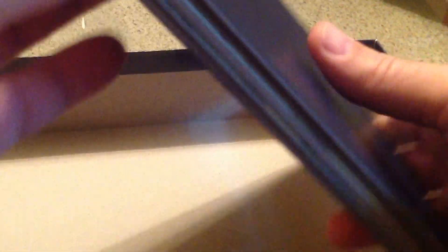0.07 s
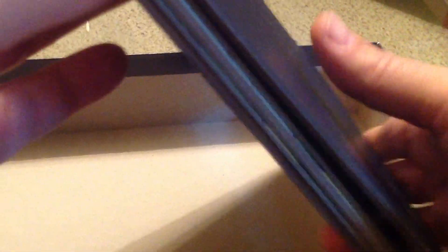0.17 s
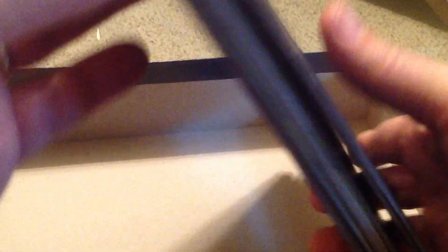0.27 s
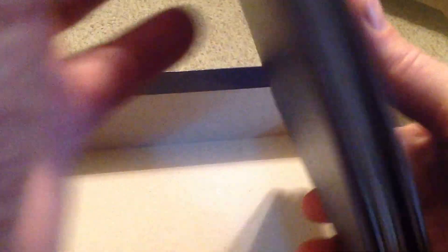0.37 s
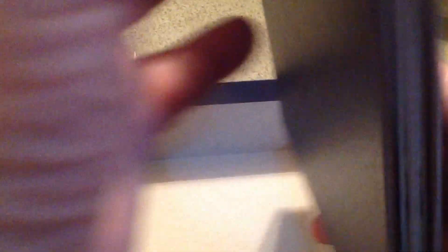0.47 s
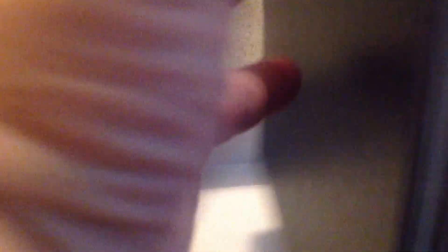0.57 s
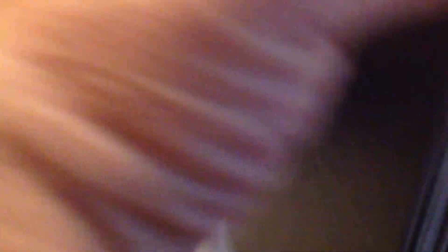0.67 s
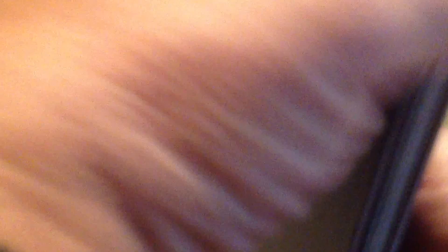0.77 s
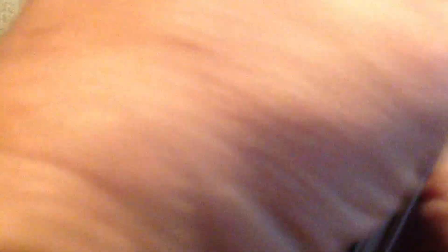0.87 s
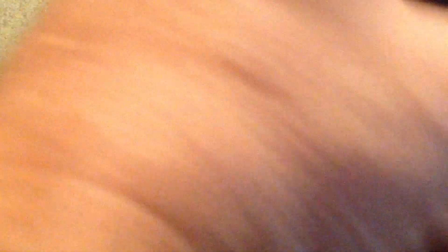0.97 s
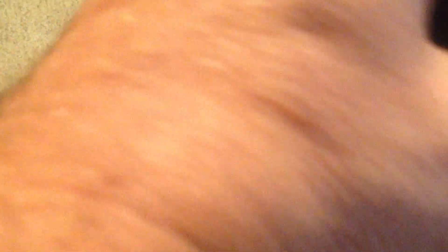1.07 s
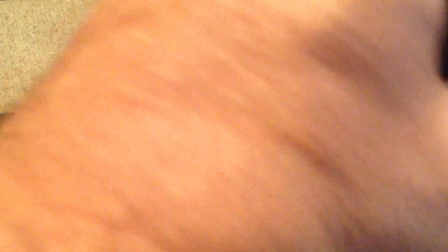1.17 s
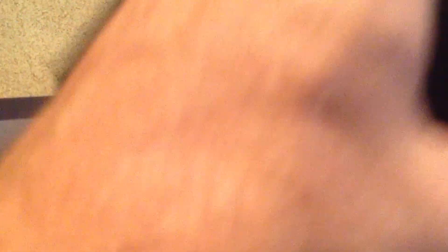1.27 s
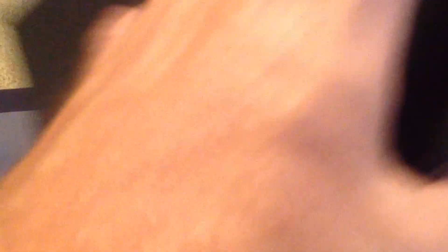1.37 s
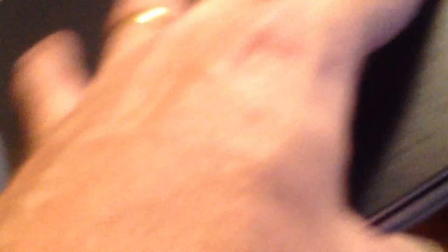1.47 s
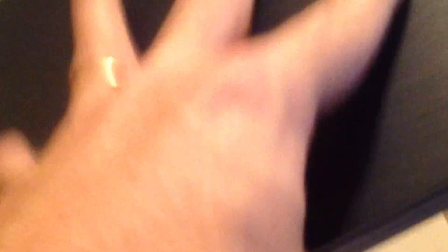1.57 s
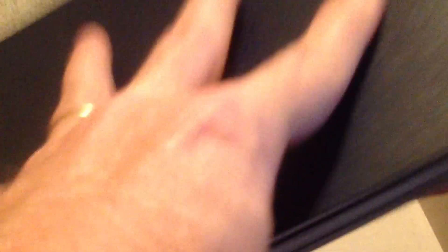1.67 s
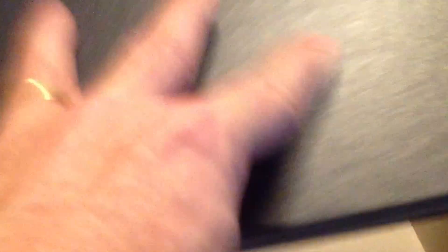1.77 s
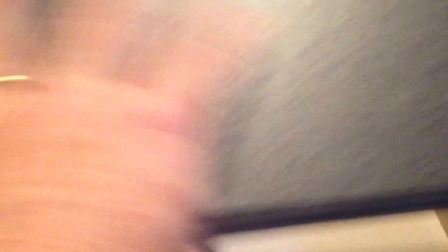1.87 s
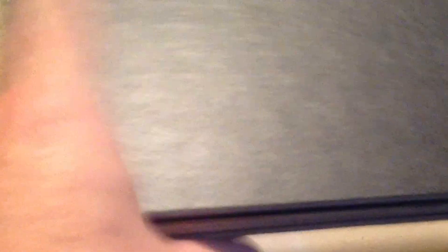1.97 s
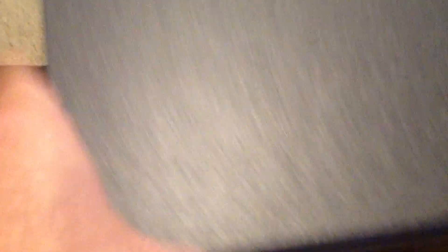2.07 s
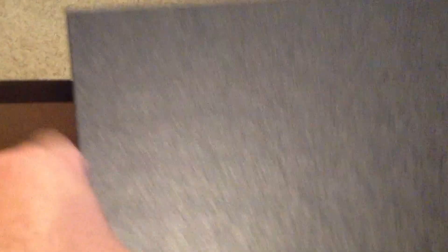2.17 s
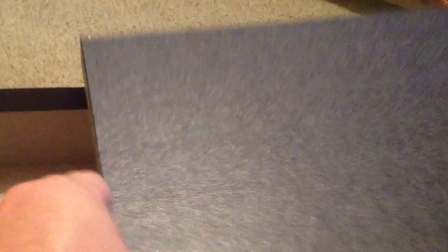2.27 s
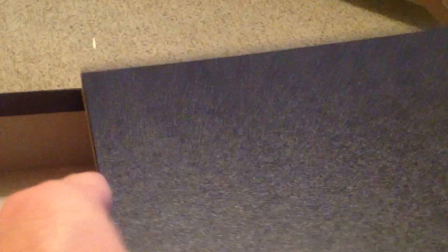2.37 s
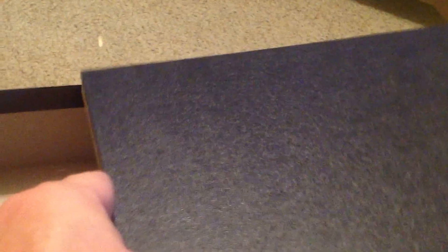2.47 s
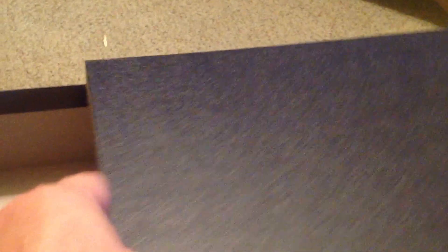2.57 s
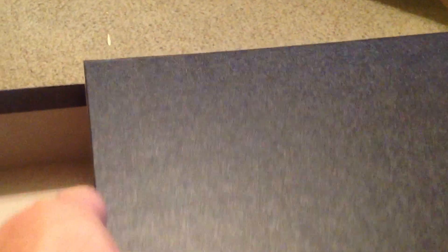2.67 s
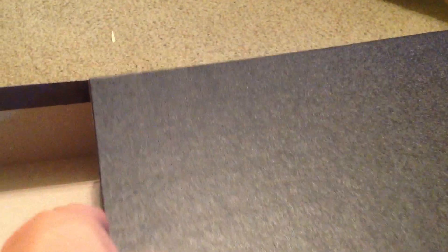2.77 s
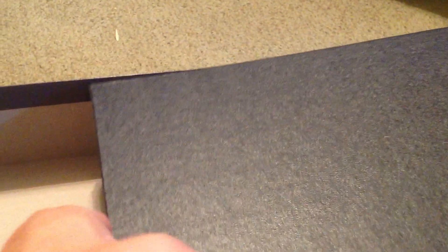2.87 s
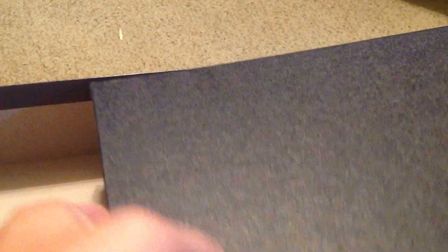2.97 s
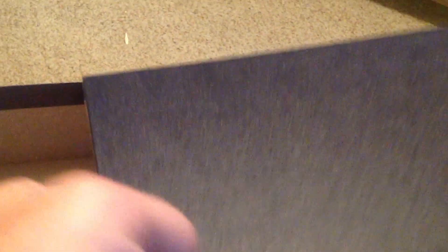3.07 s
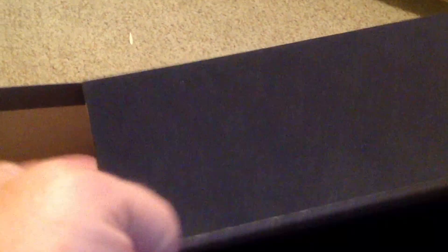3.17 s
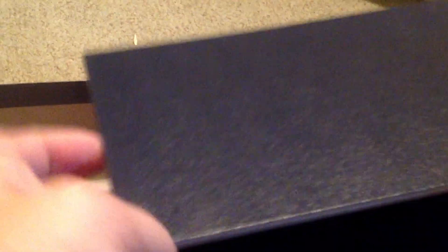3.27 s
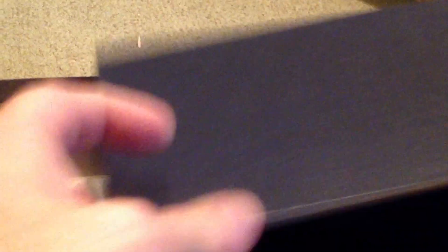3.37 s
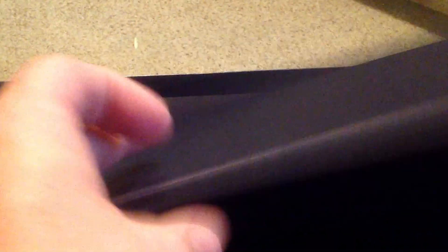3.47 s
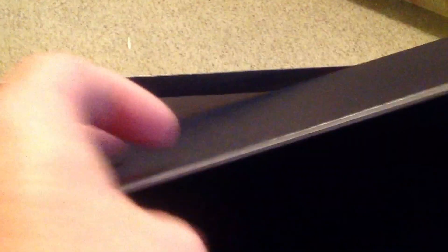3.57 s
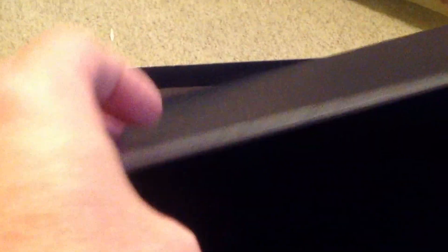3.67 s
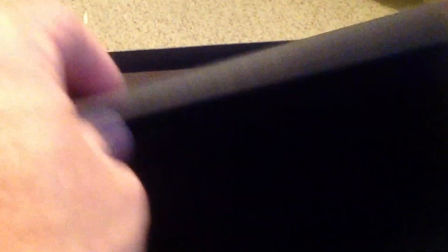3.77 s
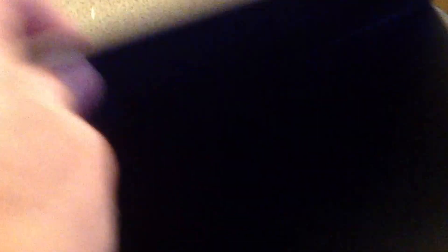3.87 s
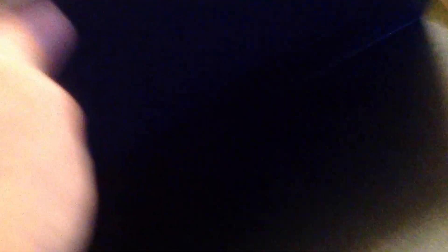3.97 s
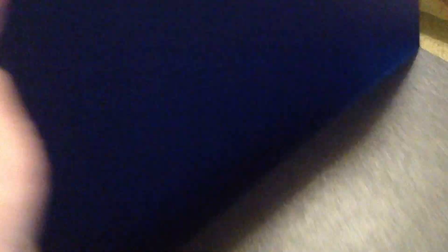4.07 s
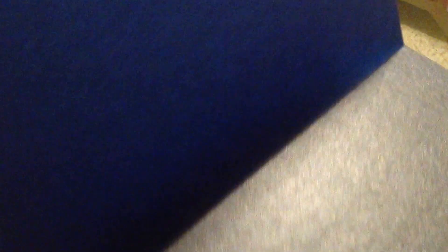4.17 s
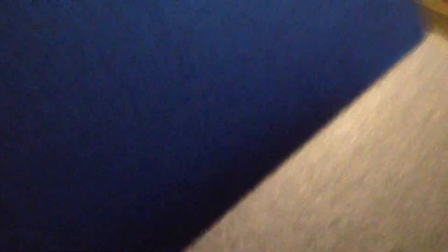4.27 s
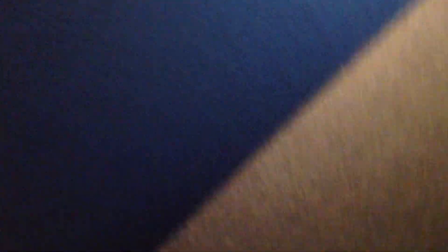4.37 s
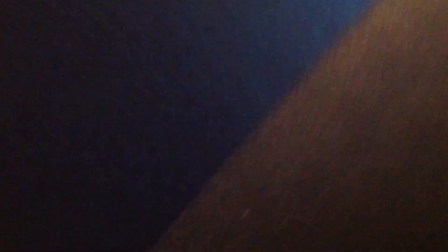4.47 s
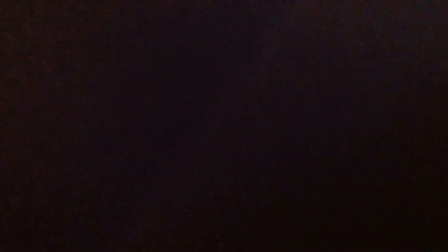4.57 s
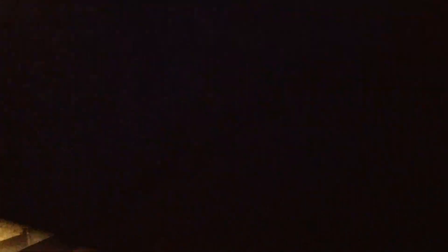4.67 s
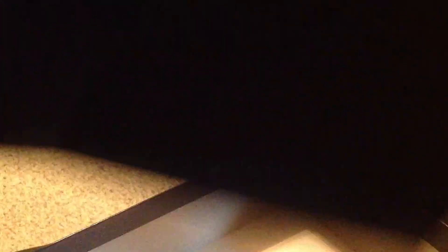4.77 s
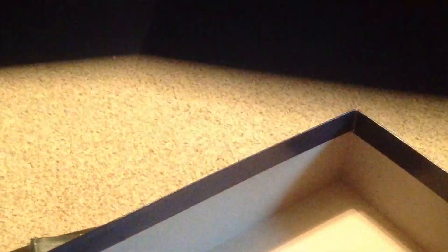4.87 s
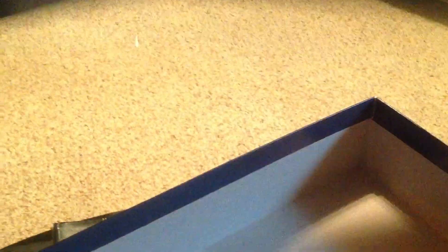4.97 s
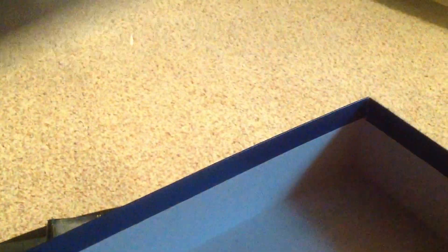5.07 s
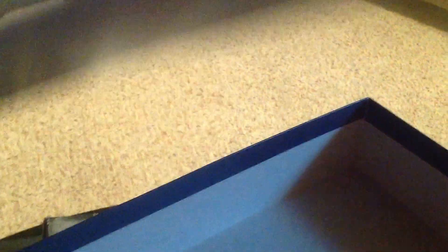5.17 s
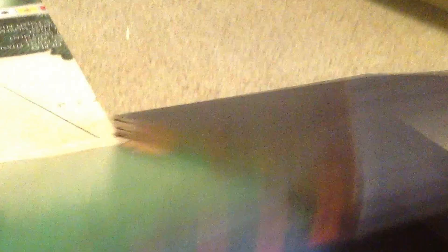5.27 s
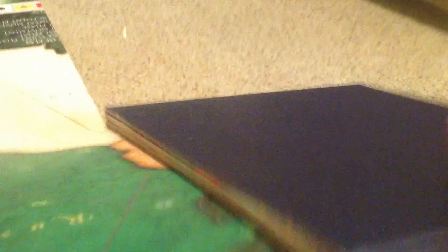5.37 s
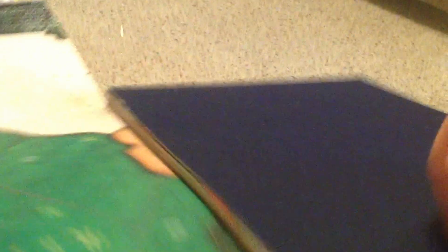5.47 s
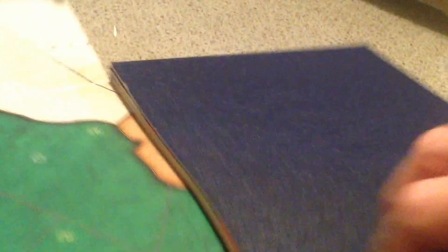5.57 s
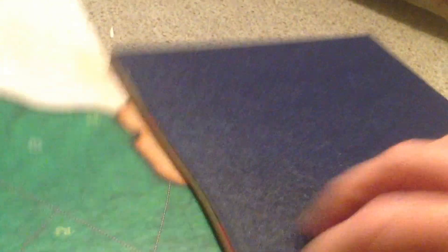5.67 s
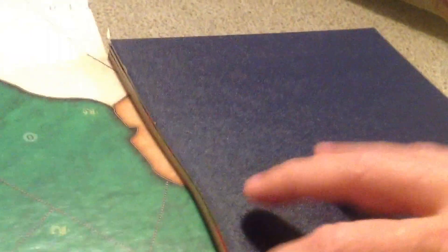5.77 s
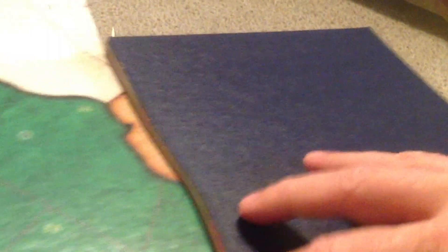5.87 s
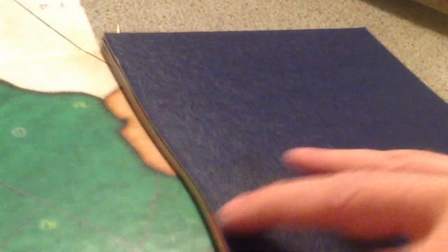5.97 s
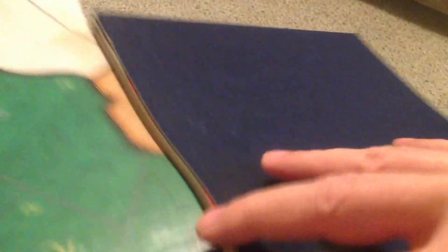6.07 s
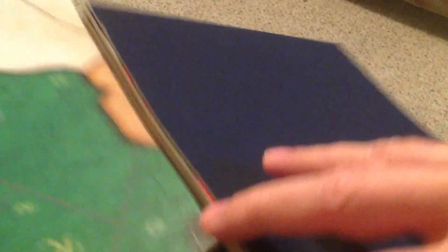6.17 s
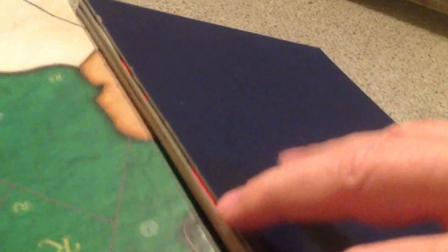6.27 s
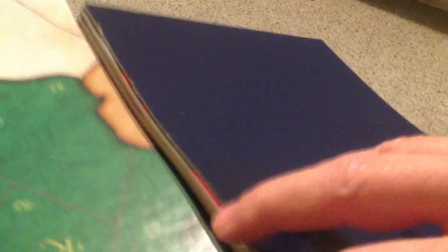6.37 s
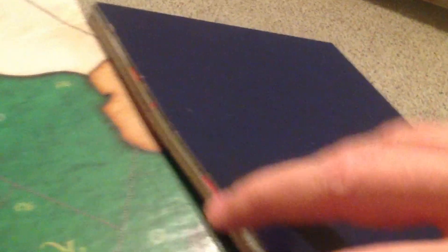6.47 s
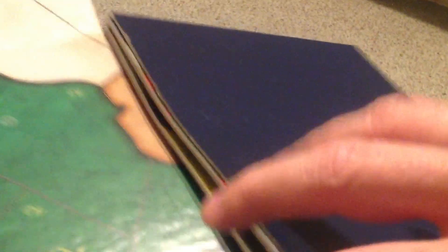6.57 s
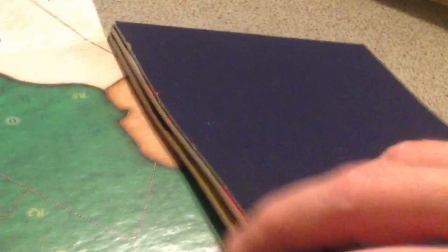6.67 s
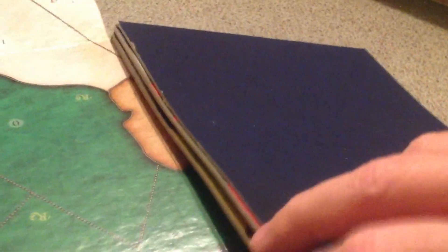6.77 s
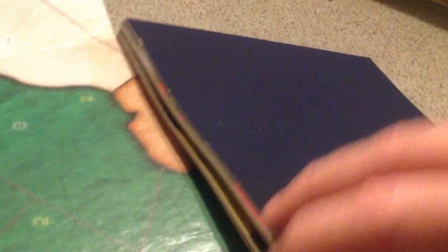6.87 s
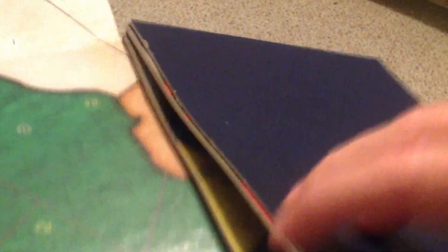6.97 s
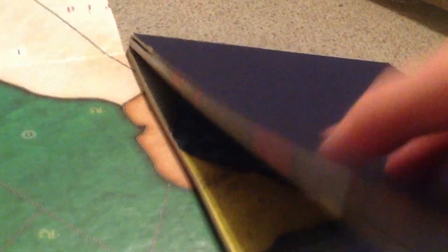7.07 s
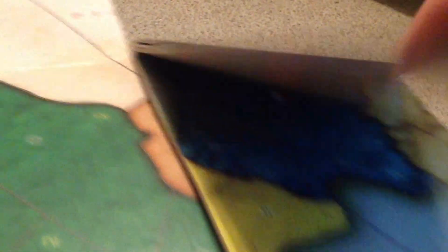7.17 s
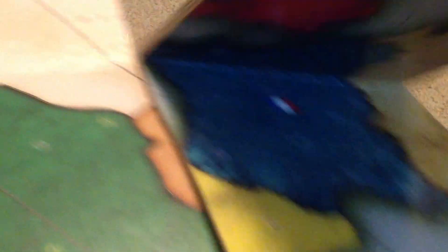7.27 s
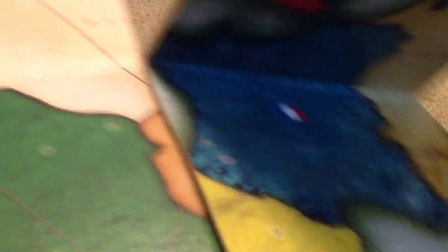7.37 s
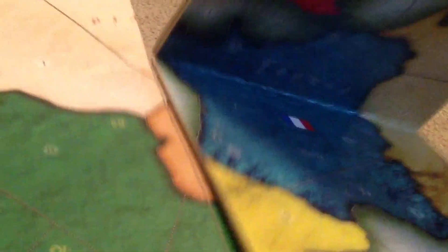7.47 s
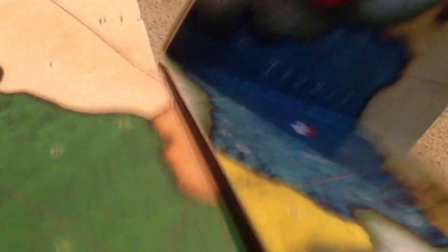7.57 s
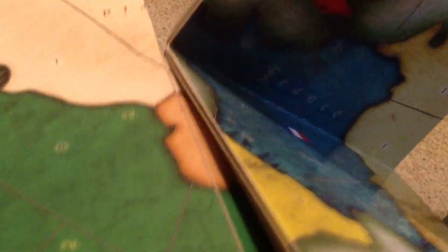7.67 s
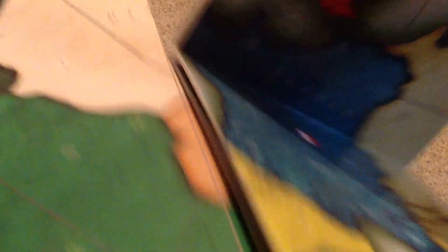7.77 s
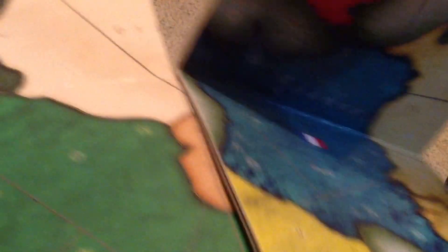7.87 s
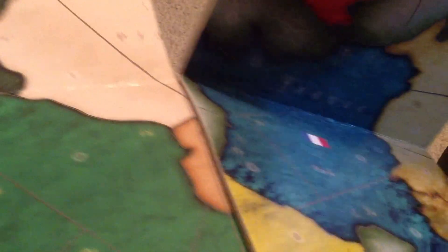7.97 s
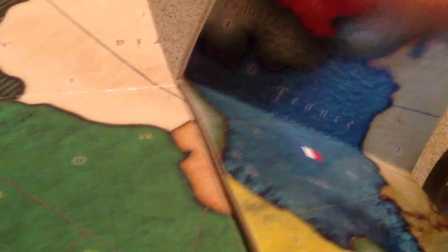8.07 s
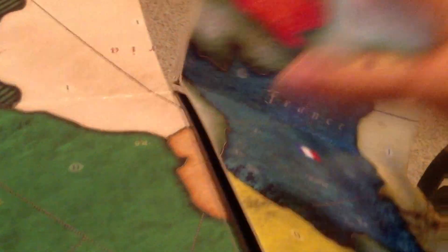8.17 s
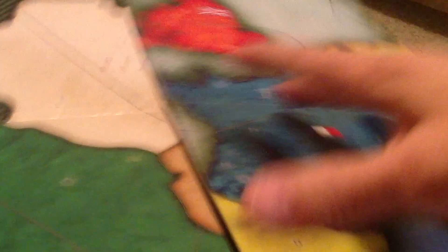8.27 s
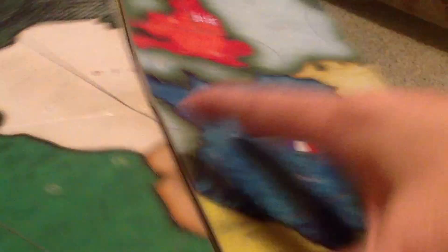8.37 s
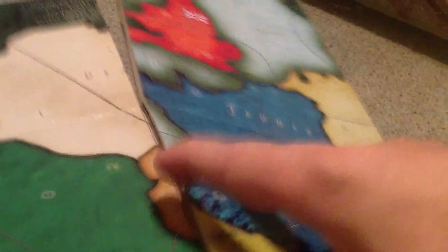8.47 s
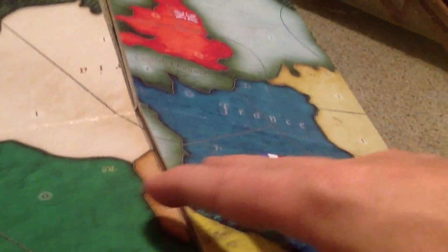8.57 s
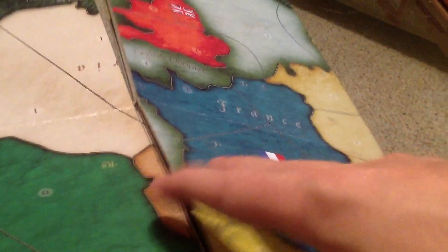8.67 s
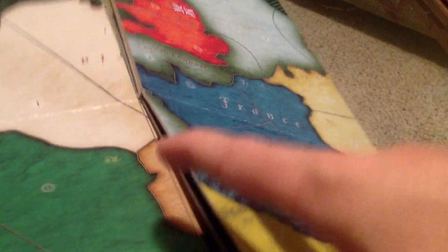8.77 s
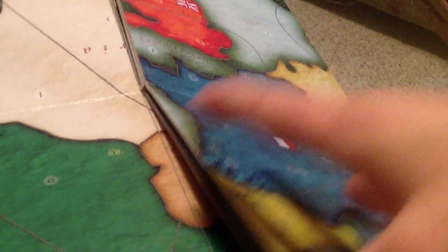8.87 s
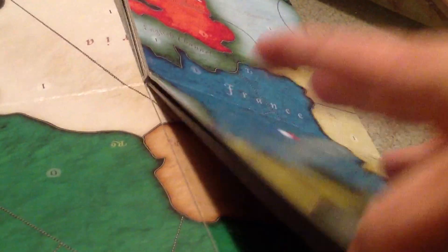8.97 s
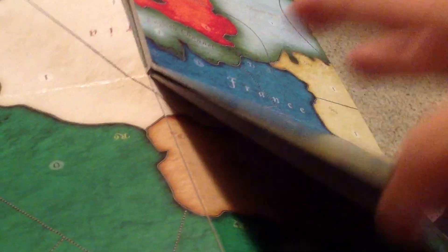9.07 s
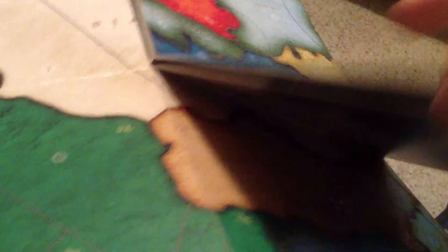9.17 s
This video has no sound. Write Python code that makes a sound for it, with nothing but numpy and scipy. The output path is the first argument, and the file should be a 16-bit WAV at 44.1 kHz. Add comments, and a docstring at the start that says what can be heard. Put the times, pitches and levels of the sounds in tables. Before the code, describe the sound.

A phone very close to the hands, in a small carpeted room with faint steady air and wavering hiss. At 0.5-0.8 s stiff card panels snap and knock sharply, then skin brushes softly over paper. Thumps and clicks come at 1.6-1.8 s. Around 2.3-2.8 s the board bumps a hollow box, with a strong dry scrape. Edge rasps lead to a rattling cluster of boxy bumps at 3.5-3.65 s, another at 4.0. Scrapes and light raps follow, with tiny high squeaks at 4.25 and 4.43 s and a rub near 4.75. A ringing flap at 5.2 precedes loud clattering slaps at 5.36-5.46 s. Small clicks and dry slides continue from 5.7, with clicks at 7.0 and 7.6 and stronger scraping near 7.9. The loudest event, a hard clap of panels, cracks at 8.37 s with a short echo. Woody fold tocks and little ticks finish by 9.1 s.

```python
"""Unfolding a cardboard game board

A folded board is lifted out of its box, laid on a carpet and unfolded, close to a phone in a small room.
Knocks are short contacts that ring the stiff panels; bumps set the walls of the hollow box booming.
Strokes are rough friction noise filtered by card and box, with a smooth skin hiss on the paper cover.
Two short squeaks are narrow noise whistles; room echo, steady air and a changing hiss lie behind it all.
"""
import sys
import numpy as np
from scipy import signal
from scipy.fft import rfft, irfft, next_fast_len
from scipy.io import wavfile
from scipy.ndimage import uniform_filter1d, map_coordinates

SR = 44100
rng = np.random.default_rng(int(sys.argv[2]) if len(sys.argv) > 2 else 0)


def persist_wave(psi):
    """Save psi, clipped to +-1, as 16-bit WAV."""
    counts = np.round(np.clip(psi, -1, 1) * 32767).astype(np.int16)
    wavfile.write(sys.argv[1], SR, np.atleast_2d(counts).T)


N = 407043
TIME = np.arange(N) / SR

# knocks on the board: (time [s], level before colouring [dB], treble from a harder or softer contact [dB],
# pitch of the struck spot [Hz], contact [name])
KNOCKS = [(0.5474, 8.5, -3.5, 4300, "snap"), (0.7502, 14, -8, 1650, "knuckle"),
          (0.7758, 10.5, -0.5, 3000, "snap"), (1.579, 10, -3, 2300, "thump"),
          (1.6079, -0.5, -1, 1340, "click"), (1.622, 1, -7, 2590, "click"), (1.6325, 2, -1, 660, "click"),
          (1.7853, -8, 8, 1600, "thump"), (1.8191, 13.5, -5.5, 2600, "thump"),
          (2.3433, -9.5, 3, 680, "box"), (2.3934, -10, 0, 570, "box"), (2.4965, 10.5, -4, 450, "clap"),
          (2.506, 9, -2, 480, "bump"), (2.5115, 11.5, -8, 480, "box"), (2.571, 2, -1, 550, "pad"),
          (2.8067, 8, -2, 900, "bump"), (3.5365, 4, -2, 580, "box"), (3.5705, 6.5, 12, 600, "box"),
          (3.579, 4, -4, 360, "box"), (3.602, 6, -5, 460, "box"), (3.613, 2, -10, 600, "box"),
          (3.641, -0.5, -2, 520, "box"), (3.985, 9, 1, 570, "box"), (4.2128, 0, -3, 1300, "knuckle"),
          (4.317, -4, -5, 1250, "knuckle"), (4.3362, -2, 4, 2720, "knuckle"),
          (4.429, 3.5, -1, 1270, "knuckle"), (4.7345, 5.5, -2, 1090, "clap"), (4.998, 4, -17, 380, "pad"),
          (5.1858, 16.5, -0.5, 930, "flap"), (5.276, -2.5, 3, 380, "pad"), (5.3619, 11, 3.5, 1950, "flap"),
          (5.3733, 20.5, 2, 1990, "slap"), (5.379, 12.5, 4, 2900, "click"), (5.4069, 18, -1, 700, "slap"),
          (5.4403, 13.5, -3, 1180, "slap"), (5.4539, 13, 1, 1520, "slap"), (5.4572, 10, -2, 1250, "click"),
          (5.724, 4.5, -2, 1080, "slap"), (5.7821, 2, -2, 330, "click"), (5.8262, -2, -4, 470, "click"),
          (5.8571, -3.5, -2, 950, "click"), (5.9066, -1, -12, 970, "knuckle"),
          (5.9534, 0, 2.5, 4300, "click"), (6.0151, 5, 3, 760, "nail"), (6.9554, 3.5, -2, 970, "click"),
          (7.0386, 1.5, -1.5, 1150, "click"), (7.6085, 11.5, -9, 2220, "click"),
          (7.7266, 7, -4, 330, "click"), (8.181, -7, -3, 1900, "click"), (8.3714, 27.5, 0, 1150, "clap"),
          (8.3772, 23.5, -4, 850, "slap"), (8.385, 21.5, -3, 320, "slap"), (8.395, 14.5, 3, 2700, "clap"),
          (8.4853, 4.5, -1, 950, "flap"), (8.5924, 0.5, 3, 690, "click"), (8.6256, -6.5, 4, 700, "click"),
          (8.7237, 4.5, 4, 2050, "fold"), (8.8086, 5, -2, 2100, "fold"), (8.8838, -1, 3, 600, "click"),
          (8.916, 0, -5, 520, "flap"), (9.0421, -1, -1, 640, "click"), (9.055, -2, -1.5, 600, "click"),
          (9.077, -2, -1, 670, "click"), (9.1096, 0.5, 1, 680, "click")]
# ways the board is struck: name: (air push [dB], thud [dB], snap [dB], tick [dB], ring [dB],
# struck spot [dB], crush decay [s], box boom [dB]), levels relative to the knock's
#   thump: a hand lands on the board            snap: the folded panels snap shut under a grip
#   bump: the board settles on the box rim      knuckle: a knuckle raps the cover
#   click: an edge or a fold catches            fold: a stiff fold gives way with a woody tock
#   nail: a fingernail or corner ticks          pad: a soft fingertip presses the panel
#   slap: an edge falls on a panel              clap: two panels meet over their whole faces and clatter
#   flap: a loose panel swings and rings        box: the board bumps the hollow box
CONTACTS = {"thump": (-14, 12, -9.5, -21.5, -9.5, 6, 0.0007, -2),
            "snap": (-14, 13, -18, -12, -9, 12, 0.0007, -2), "bump": (5, 9.5, -10, -29, 2, 5, 0.0012, 15.5),
            "knuckle": (-10, -4, -11, -29, 3, 9, 0.001, -12),
            "click": (-14, 8, -5, -22.5, -3, 6, 0.0007, -20), "fold": (-10, -8, -11, -23, 5, 5, 0.0015, -6),
            "nail": (-4, 0, -22, -16.5, -1.5, 5, 0.0007, -20),
            "pad": (-8, 11, -17, -36, 10, 7, 0.0007, -17), "slap": (2, -10, -14, -27, 0.5, 6, 0.0009, -3),
            "clap": (2, -9, -11, -24, 1, 3, 0.012, -1), "flap": (0, 0, -9.5, -28.5, 21, 5, 0.0007, -19),
            "box": (10, 4, -13, -28.5, 5, 6, 0.0018, 22.5)}
# basic spectrum of every knock: (frequency [Hz], level [dB])
BLOW = [(70, -38), (105, -21.5), (150, -20), (380, -4.5), (650, -2), (1000, -1), (1800, -1), (2700, 4),
        (4500, 4), (15000, -1.5)]
SPOT_OCTAVES = 0.22  # half-width of the struck spot's resonance


def knocks(size=4096, lag_s=0.00077, thud_hz=260, mid_lo_hz=620, mid_hi_hz=1250, snap_hz=2400, tick_hz=8500):
    """A sharp contact and its ring, coloured by how hard the two surfaces are and by where they meet."""
    t = np.arange(size) / SR
    hz = np.fft.rfftfreq(size, 1 / SR)
    # bending waves are dispersive: the treble arrives first, the lows trail (lag_s at 1 kHz)
    travel = np.exp(-4j * np.pi * lag_s * np.sqrt(1000 * hz))
    out = np.zeros(N + size)
    for s, db, treble_db, spot_hz, kind in KNOCKS:
        air_db, thud_db, snap_db, tick_db, ring_db, spot_db, crush_s, _ = CONTACTS[kind]
        hardness = [(70, air_db), (140, thud_db), (thud_hz, thud_db), (mid_lo_hz, 0), (mid_hi_hz, 0),
                    (snap_hz, snap_db + treble_db), (tick_hz, tick_db + treble_db)]
        octaves_off = np.log2((hz + 1) / spot_hz)
        spot = undb(spot_db / (1 + (octaves_off / SPOT_OCTAVES) ** 2))
        panel = rfft(unit_energy(contact(t, crush_s) + undb(ring_db) * panel_ring(t)))
        blow = panel * causal(gain_at(hz, BLOW) * gain_at(hz, hardness) * spot)
        start = int((s - lag_s / 2) * SR)
        out[start:start + size] += undb(db) * irfft(blow * travel)
    return out[:N]


def contact(t, crush_s, crush_hz=2200):
    """Card meets card: one push in the lows, a brief crush of fibres in the treble."""
    push = signal.lfilter(*signal.butter(1, crush_hz, fs=SR), signal.unit_impulse(len(t)))
    crush = unit_energy(rng.standard_normal(len(t)) * np.exp(-t / crush_s))
    return push + signal.lfilter(*signal.butter(2, crush_hz, "high", fs=SR), crush)


# bending modes of the panels: (frequency [Hz], time to fall 60 dB [s], level [dB])
PANEL_MODES = [(147, 0.063, 3), (212.4, 0.11, -1), (300, 0.03, 1), (447, 0.029, -1.5), (527, 0.062, -5.5),
               (629, 0.051, -4.5), (737, 0.056, -10), (928, 0.047, -7.5), (1270, 0.055, -14),
               (1668, 0.06, -14), (2000, 0.025, -8), (2440, 0.025, -7), (2845, 0.035, -10),
               (4200, 0.03, -9)]


def panel_ring(t, scatter=0.012, modes_db=-3):
    """Each contact point stirs the modes differently; many more die at once in a dense wash."""
    hz, t60, db = np.transpose(PANEL_MODES)[:, :, None]
    detune, turn = rng.standard_normal((2, len(hz), 1))
    swing = np.sin(2 * np.pi * (hz * (1 + scatter * detune) * t + turn))
    modes = undb(db) * np.exp(-np.log(1000) * t / t60) * swing
    wash = dying_noise(t, t60=0.078, damping=0.48)
    ring = undb(modes_db) * unit_energy(modes.sum(axis=0)) + wash
    return unit_energy(ring * (1 - np.exp(-t / 0.00025)))  # waves must first come back from the edges


def through_panel(x, modes_db=7):
    """Friction also rings the bending modes of the card."""
    ringing = sum(undb(db) * resonate(x, hz, np.log(1000) / (np.pi * t60)) for hz, t60, db in PANEL_MODES)
    return x + undb(modes_db) * ringing


def box_booms(size=8192, scatter=0.045):
    """A bump sets the box walls swinging, a little higher or lower with the load on them."""
    out = np.zeros(N + size)
    push = signal.unit_impulse(size)
    for s, db, _, _, kind in KNOCKS:
        start = int(s * SR)
        boom = through_box(push, 1 + scatter * rng.standard_normal())
        out[start:start + size] += undb(db + CONTACTS[kind][-1]) * boom
    return out[:N]


# the long and the short wall of the box: (frequency before retuning [Hz], filter width [Hz], level [dB])
BOX_MODES = [(532, 70, 0), (650, 70, -6)]


def through_box(x, tuning=1, skirt_hz=260):
    """The hollow box answers only near the pitches of its walls."""
    out = 0
    for hz, width_hz, db in BOX_MODES:
        wall = resonate(x, hz * tuning, width_hz)
        out = out + undb(db) * resonate(wall, hz * tuning, skirt_hz)
    return out


# sliding strokes: (time of fastest motion [s], rise and fade constants together [s],
# card scrape [dB], skin hiss [dB], pitch of the rubbed spot [Hz], surface [name])
STROKES = [(0.561, 0.14, -44.5, -49, 450, "carpet"), (0.88, 0.15, -50, -59, 1700, "box"),
           (0.935, 0.043, -52, -46.5, 560, "box"), (1.1, 0.072, -52.5, -47, 610, "box"),
           (1.62, 0.6, -58, -46.5, 700, "sheet"), (2.02, 0.16, -58, -42, 700, "card"),
           (2.455, 0.1, -39.5, -51, 750, "card"), (2.507, 0.016, -34, -36, 700, "sheet"),
           (2.53, 0.06, -34, -51, 600, "carpet"), (2.638, 0.24, -47, -60, 730, "card"),
           (3.13, 0.12, -51, -72, 550, "box"), (3.218, 0.045, -54, -48, 5200, "edge"),
           (3.305, 0.05, -46, -47, 600, "box"), (3.464, 0.03, -53, -41.5, 4400, "edge"),
           (3.467, 0.1, -45, -54, 860, "card"), (3.544, 0.01, -36, -33, 4500, "edge"),
           (3.568, 0.012, -27, -32, 3300, "sheet"), (3.572, 0.13, -37.5, -47, 600, "box"),
           (3.61, 0.042, -42, -60, 330, "carpet"), (3.86, 0.13, -47.5, -45.5, 1150, "box"),
           (3.964, 0.06, -41, -39.5, 600, "box"), (4.11, 0.18, -50.5, -46, 580, "box"),
           (4.2, 0.13, -40.5, -43, 2380, "card"), (4.424, 0.049, -43, -42, 560, "box"),
           (4.585, 0.06, -48, -54, 760, "hollow"), (4.66, 0.2, -50, -46, 2780, "sheet"),
           (4.755, 0.049, -35, -41, 1070, "hollow"), (4.788, 0.051, -42, -49, 200, "carpet"),
           (4.96, 0.03, -49, -45, 4500, "card"), (5.12, 0.25, -55, -48, 880, "sheet"),
           (5.234, 0.17, -48.5, -42.5, 1400, "carpet"), (5.484, 0.093, -45, -43, 1230, "carpet"),
           (5.598, 0.12, -47, -47.5, 830, "card"), (6.0, 0.04, -34, -52, 990, "sheet"),
           (6.05, 0.12, -41, -60, 750, "hollow"), (6.322, 0.16, -55, -50, 600, "card"),
           (6.485, 0.1, -43, -52, 620, "sheet"), (6.66, 0.13, -46, -52.5, 2220, "sheet"),
           (6.758, 0.017, -43, -54, 560, "box"), (6.937, 0.42, -56, -51.5, 600, "box"),
           (7.45, 0.23, -43.5, -46, 2900, "sheet"), (7.594, 0.053, -42, -49, 2200, "card"),
           (7.742, 0.063, -43, -50, 450, "box"), (7.842, 0.054, -37, -41.5, 2380, "sheet"),
           (7.945, 0.081, -31, -39.5, 450, "card"), (8.26, 0.26, -49, -72, 1160, "sheet"),
           (8.869, 0.12, -48, -53, 600, "card")]
# what the board slides on: name: (box drone [dB], panel rumble [dB], edge rasp [dB], rubbed spot [dB],
# evenness [1 dies away, 4 holds and stops]), levels relative to the scrape
SURFACES = {"box": (4.5, -8, -19, -3, 1.3), "card": (-10, -10, -20, -7, 1.2),
            "carpet": (-8, 4.6, -24, -4, 1.1), "edge": (-3, -6, 8.9, 4, 2.6),
            "sheet": (-9, -11, -13, -5, 2.8), "hollow": (-12, -7, -18, -1, 1.5)}
# spectrum of card scraping over card: (frequency [Hz], level [dB])
SCRAPE = [(150, -35), (300, -2.5), (500, -2.5), (1200, 3.5), (1800, 0.5), (2600, -1.5), (4000, -4.5),
          (6500, -12), (15000, -32)]
# spectrum of skin brushing paper: (frequency [Hz], level [dB])
SKIN = [(1000, -19), (3000, -5.5), (5000, -7.5), (7500, -6.5)]
# spectrum of the panel's low rumble: (frequency [Hz], level [dB])
RUMBLE = [(30, -54), (70, -32), (105, -22), (145, -2.5), (300, -3.5), (1000, -33.5)]
# a cut edge dragged over the cover rasps in narrow bands: (frequency [Hz], width [Hz], level [dB])
RASP = [(1940, 200, 2), (2780, 500, 0.5), (4950, 900, -2), (7860, 460, -11)]
GRIT_DB = -5  # relative to the scrape
JUDDER_DB, JUDDER_PER_S = 3, 90  # sliding on the box, the panel grabs and lets go
RISE_SHARE = .44  # a stroke gathers speed for this share of its length


def strokes(hiss_flutter_db=3.5, wall_bend=.045):
    """Each stroke gathers speed and slows again; its friction drives the rubbed spot, the box and the panel."""
    rough = friction(rate=3000, spread_db=1.0, smooth_db=3.0, flutter_db=1.7)
    scrape = colour(through_panel(rough), SCRAPE)
    # soft skin slides smoothly
    skin = colour(rng.standard_normal(N), SKIN) * undb(hiss_flutter_db * walk(rate=25))
    # shifting pressure retunes the walls
    drone = through_box(rng.standard_normal(N))
    drone = map_coordinates(drone, [np.cumsum(1 + wall_bend * walk(rate=14))], mode="mirror")
    rumble = colour(rng.standard_normal(N), RUMBLE)
    slips = friction(rate=1200, spread_db=2, smooth_db=-7, flutter_db=3.0)
    rasp = sum(undb(db) * resonate(slips, hz, width_hz) for hz, width_hz, db in RASP)
    judder = unit(undb(JUDDER_DB * walk(rate=JUDDER_PER_S)))
    gritty_scrape = unit(scrape) + undb(GRIT_DB) * grit()
    layers = np.array([gritty_scrape, unit(skin), unit(drone), unit(rumble), unit(rasp)])
    power, spots = np.zeros_like(layers), np.zeros(N)
    for fastest, length, scrape_db, skin_db, spot_hz, surface in STROKES:
        rise, fade = length * RISE_SHARE, length * (1 - RISE_SHARE)
        drone_db, rumble_db, rasp_db, spot_db, evenness = SURFACES[surface]
        levels_db = [scrape_db, skin_db, scrape_db + drone_db, scrape_db + rumble_db, scrape_db + rasp_db]
        on = (TIME > fastest - 3 * rise) & (TIME < fastest + 4 * fade)
        t = TIME[on] - fastest
        slowing = np.where(t < 0, abs(t / rise) ** (evenness + 1), abs(t / fade) ** evenness)
        speed = np.exp(-slowing)
        if surface == "box":
            speed = speed * judder[on]
        # overlapping strokes add in power
        power[:, on] += np.outer(undb(levels_db), speed) ** 2
        spots[on] += undb(scrape_db + spot_db) * speed * rubbed_spot(slips[on], spot_hz, speed)
    return np.sum(np.sqrt(power) * layers, axis=0) + spots


def friction(rate, spread_db, smooth_db, flutter_db):
    """Paper fibres catch and slip: tiny uneven clicks over a smooth hiss, under wavering pressure."""
    sizes = rng.standard_normal(N) * undb(spread_db * rng.standard_normal(N))
    slips = (rng.random(N) < rate / SR) * sizes
    hiss = undb(smooth_db) * rng.standard_normal(N)
    return (unit(slips) + hiss) * undb(flutter_db * walk(rate=130))


def grit(per_s=110, spread_db=3):
    """Fibres snag and let go: sparse small clicks that ring the card."""
    snags = (rng.random(N) < per_s / SR) * undb(spread_db * rng.standard_normal(N))
    return unit(colour(through_panel(snags, modes_db=7), SCRAPE))


SPOT_Q, SPOT_BEND = 4.5, 0.08  # the rubbed spot's sharpness; share its pitch sags as the hand eases off


def rubbed_spot(slips, hz, speed):
    """The card under the contact rings at its own pitch, a little higher while it is pressed hardest."""
    ring = resonate(resonate(slips, hz, hz / SPOT_Q), hz, hz / 2)
    play_at = np.cumsum(1 - SPOT_BEND * (1 - speed))
    return unit(np.interp(play_at, np.arange(len(ring)), ring))


# a fingertip squeaks on the glossy cover: (time of peak [s], half-length to 1/e [s], pitch [Hz], level [dB])
SQUEAKS = [(4.249, 0.011, 8300, -42.5), (4.435, 0.016, 7770, -38.5)]


def squeaks(width_hz=800):
    """Very fast, unsteady stick-slip: a short, narrow whistle."""
    out = 0
    for s, length, hz, db in SQUEAKS:
        whistle = resonate(resonate(rng.standard_normal(N), hz, width_hz), hz, width_hz)
        out = out + undb(db) * unit(whistle) * np.exp(-((TIME - s) / length) ** 2)
    return out


# spectrum of the room echo: (frequency [Hz], level [dB])
ROOM_COLOUR = [(60, 5), (300, -3), (1100, -6), (3000, -3.5)]
# the board moves away from the microphone as it is laid down: (time [s], room echo [dB])
ROOM_SEND = [(1.5, -12), (4.0, -7), (5.3, -6), (8.4, -5.5)]


def room(x, size=32768):
    """A carpeted room answers a few milliseconds later and dies quickly."""
    t = np.arange(size) / SR
    echoes = colour(dying_noise(t, t60=0.42, damping=0.099), ROOM_COLOUR)
    tail = echoes * (1 - np.exp(-(t / 0.012) ** 2))
    send = undb(np.interp(TIME, *np.transpose(ROOM_SEND)))
    return signal.fftconvolve(x * send, tail)[:N]


# spectrum of the room air: (frequency [Hz], level [dB])
QUIET = [(25, -43), (246, 2.5), (421, -2.5), (703, -6.5), (895, -9), (2010, -10), (2360, -13.5),
         (12200, -21)]
QUIET_DB = -51  # rms of the air before its hiss is rescaled
# the background hiss is stronger while the hands are close: (time [s], level before wavering [dB])
HISS_LEVEL = [(0, -1), (1.7, 4), (5.7, -5.5), (6.15, -1.5), (8.2, -2), (9.2, -3)]


def background(hiss_hz=4000):
    """Steady room air under a hiss whose level rises and falls."""
    air = undb(QUIET_DB) * unit(colour(rng.standard_normal(N), QUIET))
    hiss = signal.lfilter(*signal.butter(1, hiss_hz, "high", fs=SR), air)
    hiss_db = np.interp(TIME, *np.transpose(HISS_LEVEL)) + walk(rate=27)  # the hiss wavers a little
    return air - hiss + hiss * undb(hiss_db)


def undb(db):
    """Decibels to gain."""
    return 10 ** (np.asarray(db) / 20)


def unit(x):
    """Scale to rms 1."""
    return x / np.sqrt(np.mean(x ** 2))


def unit_energy(x):
    """Scale a response to energy 1, so that it passes white noise at an unchanged level."""
    return x / np.sqrt(np.sum(x ** 2))


def gain_at(hz, points):
    """Gain of a (frequency [Hz], level [dB]) spectrum, joined on a log-frequency axis."""
    f, db = np.transpose(points)
    return undb(np.interp(np.log(hz + 1), np.log(f), db))


def colour(x, points):
    """Give a signal a (frequency [Hz], level [dB]) spectrum."""
    size = next_fast_len(len(x))
    gain = gain_at(np.fft.rfftfreq(size, 1 / SR), points)
    return irfft(rfft(x, size) * gain, size)[:len(x)]


def causal(gain):
    """Minimum-phase response with this gain: nothing sounds before the contact."""
    cepstrum = irfft(np.log(gain))
    half = len(cepstrum) // 2
    # fold the backward half of time onto the forward half
    cepstrum[1:half] *= 2
    cepstrum[half + 1:] = 0
    return np.exp(rfft(cepstrum))


def resonate(x, hz, width_hz):
    """One resonance, gain 1 at its centre."""
    return signal.lfilter(*signal.iirpeak(hz, hz / width_hz, fs=SR), x)


def walk(rate):
    """Smooth random wander, rms 1, heading for a new value this many times a second."""
    hold = int(SR / rate)
    steps = rng.standard_normal(N)[np.arange(N) // hold]
    return unit(uniform_filter1d(steps, hold))


def dying_noise(t, t60, damping):
    """Dense echoes in octave bands; t60 holds at 1 kHz and shortens with pitch."""
    hz = np.fft.rfftfreq(len(t), 1 / SR)
    centre = 1000 * 2. ** np.arange(-4, 5)[:, None]
    band_gain = np.clip(1 - abs(np.log2((hz + 1) / centre)), 0, 1)
    bands = irfft(rfft(rng.standard_normal(len(t))) * band_gain)
    life = t60 * (1000 / centre) ** damping
    return unit_energy(np.sum(bands * np.exp(-np.log(1000) * t / life) / np.sqrt(life), axis=0))


def scene():
    """The handled board, its echo and the quiet room."""
    board = knocks() + box_booms() + strokes() + squeaks()
    return (board + room(board) + background())[None]


TOP_HZ = 15250  # upper edge of the phone's band


def record(dry):
    """The phone clips peaks at full scale, then a steep low-pass cuts the top."""
    low_pass = signal.ellip(10, .1, 80, TOP_HZ, fs=SR, output="sos")
    return signal.sosfilt(low_pass, np.clip(dry, -1, 1))


dry = scene()
out = record(dry)
persist_wave(out)
```